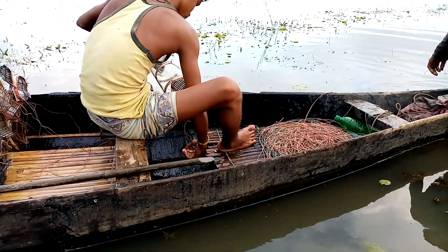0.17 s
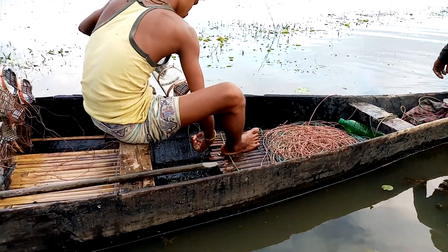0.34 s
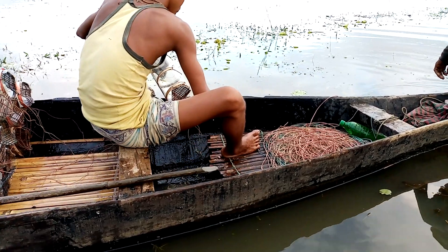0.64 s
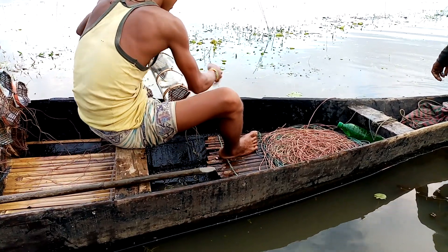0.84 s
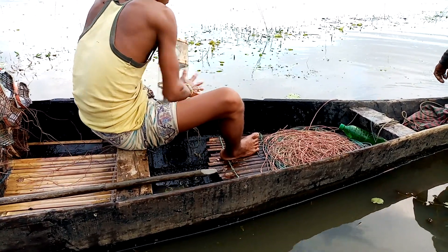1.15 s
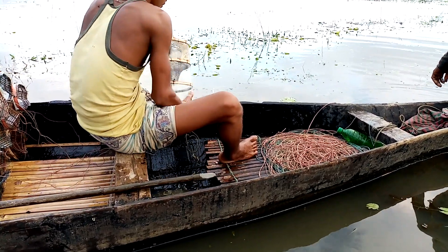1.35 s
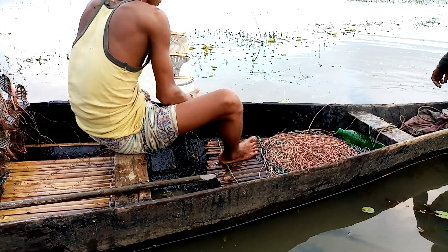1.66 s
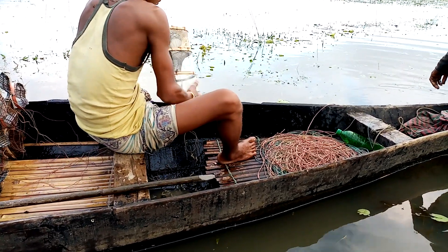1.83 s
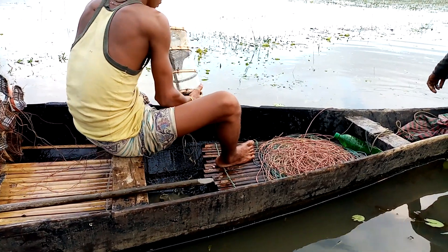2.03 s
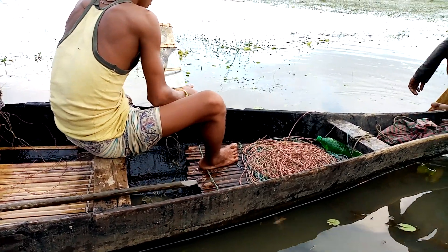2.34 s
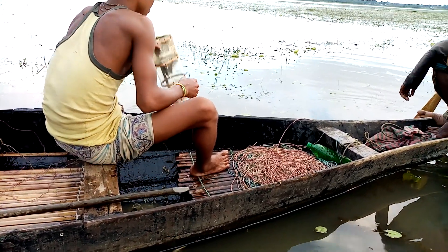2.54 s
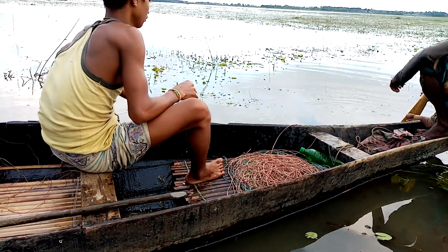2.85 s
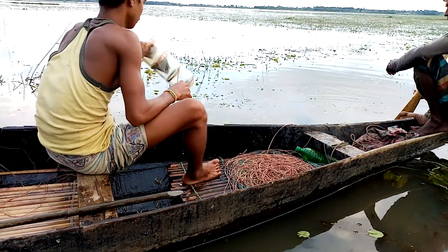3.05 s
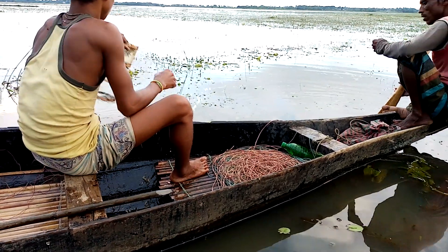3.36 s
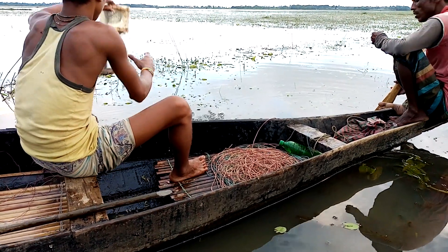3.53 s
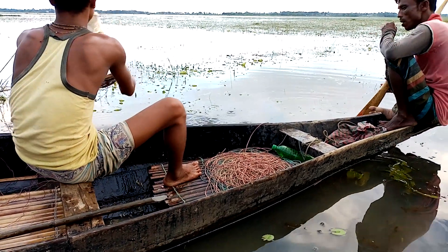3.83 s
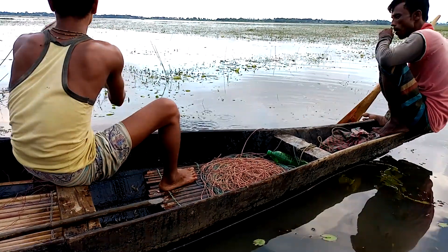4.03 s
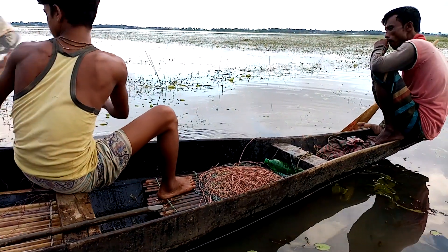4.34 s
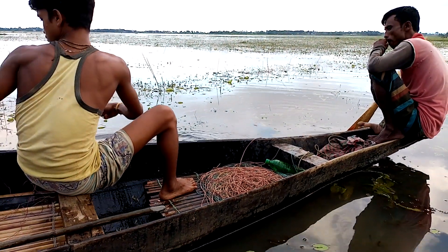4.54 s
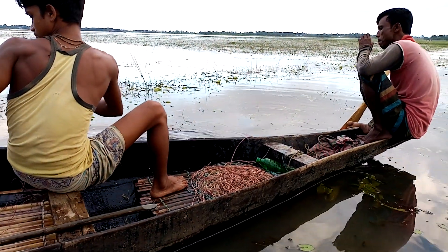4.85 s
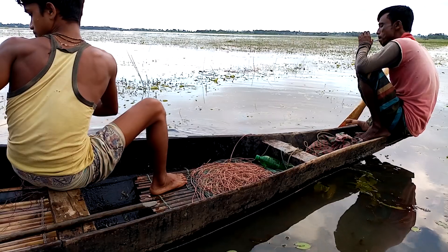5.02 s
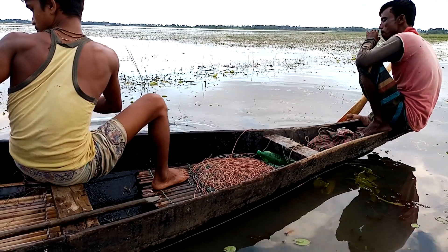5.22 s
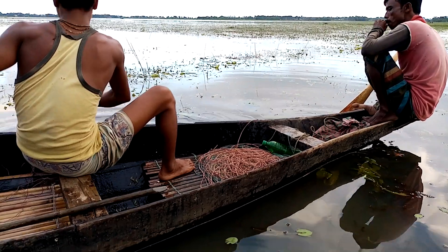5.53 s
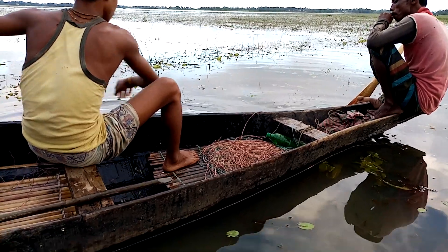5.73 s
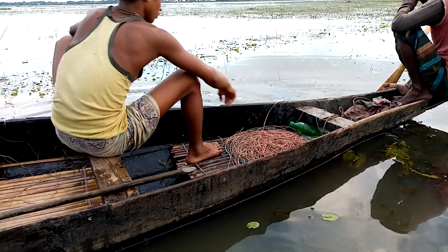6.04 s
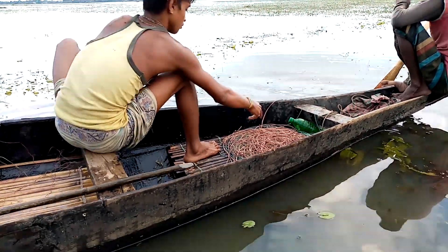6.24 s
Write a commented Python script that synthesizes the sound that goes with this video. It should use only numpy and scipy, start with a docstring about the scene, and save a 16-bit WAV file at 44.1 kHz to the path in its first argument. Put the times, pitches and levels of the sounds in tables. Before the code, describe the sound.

Scattered woody knocks and sharp clicks of handled gear, short rubs of cloth and line, faint distant birds over open water.

```python
"""Fishing gear in a wooden boat

Fishing gear is handled in a boat on a quiet wetland, close to a phone with two microphone ports.
A light reel and its stick knock and chatter: bursts of tiny contacts ring the gear and the hull.
Line and cloth rustle as filtered noise; drops, a squeak and a hum are sine tones or narrow noise.
Small birds and a cock call far off as gliding tones. Noise makes the marsh air and a breeze that
buffets mainly the right port."""
import sys
import numpy as np
from scipy import signal
from scipy.fft import rfft, irfft
from scipy.io import wavfile
from scipy.ndimage import uniform_filter1d, map_coordinates

SR = 44100
rng = np.random.default_rng(int(sys.argv[2]) if len(sys.argv) > 2 else 0)


def to_wav(s):
    """Save 16-bit WAV."""
    ch = np.atleast_2d(s).T  # columns
    pcm = np.round(np.clip(ch, -1, 1) * 32767)  # PCM
    wavfile.write(sys.argv[1], SR, pcm.astype(np.int16))


N = 281358  # length in samples
T = np.arange(N) / SR

# What the gear rings with. Each row: pitch in Hz, width of one filter pass in Hz, level in dB.
WOOD = [(500, 180.6, 0), (727, 85, -3.5), (824, 180, -5.5), (995, 92, -12), (1353, 150, -2), (1774, 56, -6),
        (1926, 109.4, -14.5), (2337, 90, 3), (2925, 130, -0.5)]
# What the hull rings with. Each row: pitch in Hz, width of one filter pass in Hz, level in dB.
HULL = [(190, 73, -3.5), (229.4, 53, 1), (330, 30, -5.5)]
# Colour of the body of a rub. Each row: frequency in Hz, level in dB.
RUB_BODY = [(150, -46), (400, 13.5), (560, 4.5), (900, 9.5), (1150, 8), (1500, 10), (2300, 13.5),
            (3200, -17.5), (5000, -47.5)]
LOOSE_PART_HZ = 980  # ring of the spot struck by a click; the rattle varies around it


def undb(db):
    """Turn decibels into gain."""
    return 10 ** (np.asarray(db) / 20)


def unit(x):
    """Scale to an rms (average strength) of 1."""
    return x / np.sqrt(np.mean(x ** 2))


def dose(x, db):
    """Give a blow the energy of 10 ms of sound at this level."""
    return x * undb(db) * np.sqrt(.01 * SR / np.sum(x ** 2))


def add(out, s, x):
    """Mix x in at time s in seconds."""
    i = max(int(s * SR), 0)
    out[i:i + len(x)] += x[:N - i]


def colour(x, points):
    """Filter by a curve of (Hz, dB) points, joined by straight lines over log frequency."""
    hz, db = np.transpose(points)
    f = np.maximum(np.fft.rfftfreq(len(x), 1 / SR), 1)
    gain = undb(np.interp(np.log(f), np.log(hz), db))
    return irfft(rfft(x) * gain, len(x))


def ring(x, modes):
    """Drive damped resonances (Hz, width in Hz, dB); neighbours move in opposite directions."""
    total = 0
    for k, (hz, width, db) in enumerate(modes):
        resonance = signal.lfilter(*signal.iirpeak(hz, hz / width, SR), x)
        total = total + (-1) ** k * undb(db) * resonance
    return total


def walk(rate):
    """Smooth random wander with a spread of 1, newly aimed about rate times a second."""
    k = max(int(SR / rate), 1)
    steps = np.repeat(rng.standard_normal(N // k + 1), k)
    smooth = uniform_filter1d(uniform_filter1d(steps, k), k)
    return unit(smooth[:N])


def grit(count, share, spread_db):
    """Tiny contacts of very unequal size on a share of the samples."""
    touching = rng.random(count) < share
    size = undb(spread_db * np.minimum(rng.exponential(size=count), 4))
    return rng.standard_normal(count) * touching * size


def shifting(x, flicker_db, rate):
    """Third-octave bands centred from 125 Hz to 16 kHz swell and drop, each on its own."""
    spectrum = rfft(x)
    place = 3 * np.log2(np.maximum(np.fft.rfftfreq(N, 1 / SR), 1) / 125)
    total = 0
    for k in range(22):
        band = irfft(spectrum * np.maximum(1 - abs(place - k), 0), N)
        total = total + band * undb(flicker_db * walk(rate))
    return total


def glide(length, start_hz, end_hz, waver):
    """Phase of a tone that slides in pitch and wavers by a share of it."""
    count = int(length * SR)
    hz = np.linspace(start_hz, end_hz, count) * (1 + waver * walk(860)[:count])
    return 2 * np.pi * np.cumsum(hz) / SR


def breeze():
    """Turbulence rumbles on the right port; the left one lies in the lee and gets far less."""
    # Strength of the breeze before each port's own gain. Each row: time in seconds, level in dB.
    strength = [(0, -67), (0.08, -51.5), (0.3, -52), (0.42, -61.5), (0.74, -41.5), (0.85, -48.5),
                (0.96, -49.5), (1.45, -79), (1.95, -64.5), (2.3, -73), (2.85, -63.5), (3.0, -50.5),
                (3.5, -51.5), (4.05, -57), (4.7, -80), (5.2, -57), (5.45, -86), (5.9, -62.5), (6.1, -65),
                (6.38, -67.5)]
    # Colour of the rumble. Each row: frequency in Hz, level in dB.
    buffet = [(20, -29), (45, -9), (80, 5.5), (130, -0.5), (200, -10), (300, -26), (500, -46), (1500, -82)]
    # Single eddies that slap the right port. Each row: time of the middle in seconds, peak in dB, pitch in Hz.
    eddies = [(0.581, -32.5, 128), (0.721, -29.5, 238), (.737, -34, 102), (3.453, -33.5, 105),
              (3.773, -38.5, 101), (6.087, -39, 87)]
    gust = undb(np.interp(T, *np.transpose(strength)))
    rumbles = []
    for _ in range(2):
        flutter = undb(2.8 * walk(25))
        rumbles.append(gust * flutter * unit(colour(rng.standard_normal(N), buffet)))
    lee, exposed = rumbles
    exposed = undb(3.0) * exposed
    for s, db, hz in eddies:
        cycles = (T - s) * hz
        swell = np.exp(-(cycles / 0.69) ** 2)
        exposed = exposed + undb(db) * swell * np.cos(2 * np.pi * (cycles + rng.random()))
    return np.array([undb(-20) * lee, exposed])


def marsh():
    """Soft, restless air over open water: separate noise at each port."""
    # Colour of the air. Each row: frequency in Hz, level in dB per Hz, relative.
    air_colour = [(18, -55.5), (30, -8.5), (157, -1), (227, -9), (600, -20.5), (801, -17.5), (937, -21.5),
                  (1540, -23), (2170, -21), (2680, -23.5), (2980, -27), (8740, -26.5), (10800, -35.5),
                  (16000, -29.5)]
    level_db = -71.5
    ports = []
    for side_db in (-1.5, 1.5):  # left, right
        air = shifting(rng.standard_normal(N), flicker_db=1.5, rate=11)
        ports.append(undb(level_db + side_db) * unit(colour(air, air_colour)))
    return np.array(ports)


def hum():
    """Noise through one narrow resonance, twice, makes a faint, wavering low hum that dies out."""
    # Loudness of the hum at its source. Each row: time in seconds, level in dB.
    loudness = [(0, -77.5), (1.15, -68), (1.75, -75), (2.1, -88.5)]
    line = [(224.0, 26, 0)]
    tone = unit(ring(ring(rng.standard_normal(N), line), line))
    return undb(np.interp(T, *np.transpose(loudness))) * tone


def birds():
    """Gliding tones: short upward whistles, hoarser calls from far away and a faint crow."""
    # A small bird's rising whistles. Each row: start in seconds, level in dB.
    whistles = [(3.638, -75), (3.997, -75), (4.69, -73), (5.43, -81), (5.778, -75), (6.122, -74)]
    # Their pitch, shifted slightly for each whistle. Each row: seconds from its start, pitch in Hz.
    whistle_shape = [(0, 3230), (.028, 3400), (.048, 3780), (.064, 4050), (.08, 4300)]
    # Calls over the marsh, before the waver. Each row: start in seconds, length in seconds,
    # first pitch in Hz, last pitch in Hz, level in dB.
    far_calls = [(0.049, 0.05, 2400, 2250, -77), (0.128, 0.034, 2560, 2170, -70),
                 (0.304, 0.019, 2110, 2320, -71.5), (0.379, 0.19, 2870, 2600, -86.5),
                 (0.67, 0.24, 1750, 2084, -75.5), (0.769, 0.26, 1966, 1821, -76),
                 (2.08, 0.087, 4450, 3240, -80.5), (2.37, 0.057, 4620, 3300, -78.5)]
    # A very distant cock crows, before the waver. Each row: start in seconds, length in seconds,
    # first pitch in Hz, last pitch in Hz, level in dB.
    crow = [(4.55, .28, 510, 495, -87), (5.12, .27, 545, 510, -82), (5.64, .36, 500, 490, -85)]
    # Overtones of the crow. Each row: multiple of its pitch, level in dB.
    crow_partials = [(2, -1), (4, 0), (5, -6)]
    out = np.zeros(N)
    s_shape, hz_shape = np.transpose(whistle_shape)
    t = np.arange(int(s_shape[-1] * SR)) / SR
    for s, db in whistles:
        hz = np.interp(t, s_shape, hz_shape) * (1 + 0.0032 * rng.standard_normal())
        tone = np.sin(2 * np.pi * np.cumsum(hz) / SR)
        add(out, s, undb(db) * unit(signal.windows.tukey(len(t), .5) * tone))
    for s, length, start_hz, end_hz, db in far_calls:
        phase = glide(length, start_hz, end_hz, waver=.05)
        add(out, s, undb(db) * unit(signal.windows.cosine(len(phase)) * np.sin(phase)))
    for s, length, start_hz, end_hz, db in crow:
        phase = glide(length, start_hz, end_hz, waver=.028)
        voice = sum(undb(partial_db) * np.sin(k * phase) for k, partial_db in crow_partials)
        add(out, s, undb(db) * unit(signal.windows.cosine(len(phase)) * voice))
    return out


def ticks():
    """Faint stray ticks of line and fingers, each with a brief ring of its own."""
    out, t = np.zeros(N), np.arange(SR // 25) / SR
    for when, height, size in rng.random(size=(45, 3)):
        snap = rng.standard_normal(len(t)) * np.exp(-t / .003)
        mode = [(5000 * 2 ** height, 2500, 0)]
        add(out, when * T[-1], dose(ring(ring(snap, mode), mode), -83 + 12 * size))
    return out


def blow(db, crack_db, hull_db, spot_hz, decay_ms):
    """Each blow is a short chatter of contacts that rings the gear and, through the boards, the hull."""
    # Stiff modes behind the sharp crack. Each row: pitch in Hz, width of one filter pass in Hz, level in dB.
    crack_modes = [(3510, 380, 1), (4036, 170, 0.5), (4390, 400, -0.5), (5520, 270, -4.5), (6124, 300, 7),
                   (6400, 560, 4), (7150, 140, -19), (9640, 770, -3)]
    t = np.arange(SR // 5) / SR
    age = t / (decay_ms / 1000)
    # a longer contact also builds more slowly; the gear then scrapes faintly as it settles
    press = (1 - np.exp(-age / .4)) * np.exp(-age) + undb(-33) * np.exp(-t / .025)
    contact = grit(len(t), .4, 2.4) * press
    detune = 1 + 0.068 * rng.standard_normal()  # the grip shifts the gear's modes
    gripped = [(hz * detune, width, mode_db) for hz, width, mode_db in WOOD]
    modes = unit(ring(ring(contact, gripped), [(1300, 5300, 0)]))
    spot = unit(ring(contact, [(spot_hz, 90, 0)]))
    scrape = unit(colour(contact, RUB_BODY))
    wood = modes + undb(-3) * spot + undb(-3) * scrape
    # light touches only tick; hard blows bring out the stiff modes
    tick = unit(ring(ring(contact, [(6900 * detune, 1800, 0)]), [(7550, 7100, 0)]))
    stiff = unit(ring(ring(contact, crack_modes), [(5086, 1530, 0)]))
    crack = stiff + undb(-.5 * (db + 52.0)) * tick
    thud = ring(ring(contact, HULL), [(260, 830, 0)])
    total = dose(wood, db) + dose(crack, db + crack_db) + dose(thud, db + hull_db)
    return total * (1 - t / t[-1])


def knocks():
    """Knocks, dull taps and sharp clicks strike the same gear and differ in the hardness of the contact."""
    # Gear knocks on wood. Each row: start in seconds, level of the wood in dB, crack in dB relative
    # to the wood, ring of the struck spot in Hz, decay of the contact in milliseconds.
    hard_knocks = [(1.081, -29, -4.5, 1290, 15.7), (1.0973, -33.5, 8.5, 1330, 2.44),
                   (1.134, -47, 3, 760, 4.8), (1.2172, -52, -2.5, 1280, 4.2), (1.2543, -33.5, -3, 878, 6.4),
                   (1.2681, -35, -11, 980, 4), (1.377, -52, 0, 825, 4.6), (1.4551, -56.5, -2, 875, 3.1),
                   (1.495, -53, -4, 1370, 8.7), (1.7873, -41.5, -3.5, 1240, 7),
                   (1.802, -40.5, -5.5, 690, 6.7), (1.914, -36.5, -12, 815, 4.9),
                   (2.649, -42.5, 0.5, 710, 8), (2.7562, -46.5, -3, 1315, 6.6),
                   (3.2095, -53.5, 0.5, 1410, 4.2), (3.5013, -51, -1.5, 680, 5.6),
                   (3.636, -51, -2, 640, 10.3), (3.844, -51.5, 5, 1920, 2.5), (4.3805, -48, 4.5, 537, 3.6),
                   (4.962, -50, -10, 1000, 2.84), (5.649, -62, 10.5, 670, 7.6)]
    # Dull taps of a hand on the gear. Each row: start in seconds, level in dB, ring of the spot in Hz.
    taps = [(1.355, -50.5, 810), (2.028, -66.5, 880), (3.058, -54.5, 835), (3.486, -53, 654),
            (3.522, -51.5, 640), (3.737, -57.5, 607), (4.26, -60.5, 580), (4.82, -53, 676),
            (5.1207, -45.5, 940), (5.1335, -47.5, 964), (5.1627, -51.5, 880)]
    # Sharp clicks of line and reel. Each row: start in seconds, level of the crack in dB.
    clicks = [(0.289, -65), (2.2875, -57.5), (2.578, -59.5), (3.0726, -42.5), (3.4412, -51), (4.482, -60.5),
              (5.757, -56.5), (6.091, -73.5)]
    knock_hull_db = -11.5  # hull levels and crack levels are relative to the wood
    # a soft contact hardly cracks and is dull above this pitch
    tap_ms, tap_crack_db, tap_hull_db, tap_soft_hz = 4.1, -26, -12, 1630
    click_ms, click_crack_db, click_hull_db = 1, 24, -18  # a hard, light contact is nearly all crack
    out = np.zeros(N)
    for s, db, crack_db, spot_hz, decay_ms in hard_knocks:
        add(out, s, blow(db, crack_db, knock_hull_db, spot_hz, decay_ms))
    for s, db, spot_hz in taps:
        tap = blow(db, tap_crack_db, tap_hull_db, spot_hz, tap_ms)
        soft = signal.lfilter(*signal.butter(2, tap_soft_hz, fs=SR), tap)
        add(out, s, dose(soft, db))
    for s, db in clicks:
        add(out, s, blow(db - click_crack_db, click_crack_db, click_hull_db, LOOSE_PART_HZ, click_ms))
    return out


def bumps():
    """Dull thumps, the first from wind, the rest from boards set swinging: a fading tone and a little clunk."""
    # Dull bumps of feet and gear on the boards; the first is the upper part of a wind thump.
    # Each row: start in seconds, level in dB, pitch in Hz, decay in milliseconds.
    dull_bumps = [(0.716, -51.5, 446, 2.8), (1.791, -43.5, 200, 4.1), (2.711, -52, 309, 16),
                  (2.758, -40, 298, 21), (2.891, -51, 262, 10.4), (5.42, -62.5, 272, 9.7),
                  (6.265, -49, 151, 24), (6.269, -57, 310.5, 11.5)]
    out, t = np.zeros(N), np.arange(SR // 5) / SR
    for s, db, hz, decay_ms in dull_bumps:
        fade = (1 - np.exp(-t / 0.0031)) * np.exp(-t / (decay_ms / 1000))
        clunk = unit(ring(ring(rng.standard_normal(len(t)), WOOD), [(600, 190, 0)]))
        tone = np.sin(2 * np.pi * hz * t)
        add(out, s, dose(fade * (tone + undb(-29) * clunk), db))
    return out


def rustle():
    """Line and cloth slide in a long rummage and in quick strokes: dense slips with a trace of ringing."""
    # The long rummage, before the final gains. Each row: time in seconds, body in dB, hiss in dB.
    rummage = [(2.629, -77, -83), (2.661, -46.5, -51), (2.73, -59.5, -65), (2.79, -47, -63),
               (2.85, -58.5, -64.5), (3.22, -61.5, -65.5), (3.32, -54, -57.5), (3.5, -69.5, -63.5),
               (3.6, -91, -77)]
    # Single short strokes of line or hand, before the final gains. Each row: start in seconds,
    # length in seconds, body in dB, hiss in dB.
    rubs = [(1.141, 0.11, -74, -76), (1.326, 0.15, -62.5, -68), (3.65, 0.47, -74, -82),
            (4.336, 0.057, -51.5, -51.5), (4.946, 0.056, -55, -60.5), (5.038, 0.055, -59.5, -57.5),
            (5.11, 0.051, -53, -63.5), (5.646, 0.039, -60, -59)]
    # Colour of the hiss. Each row: frequency in Hz, level in dB.
    rub_hiss = [(2000, -22), (3500, -1.5), (5000, -0.5), (6500, 1.5), (8500, -9), (10500, -13.5),
                (16000, -28.5)]
    hull_db, swell_db = -14, 2.5  # rubbing stirs the hull; the body swells and sinks with the hand's pressure
    times, *levels = np.transpose(rummage)
    # silent before and after the rummage; powers add up
    body_power, hiss_power = (undb(np.interp(T, times, db, -np.inf, -np.inf)) ** 2 for db in levels)
    for s, length, body_db, hiss_db in rubs:
        # catches quickly and dies away
        stroke = np.exp(np.minimum(T - s, 0) / 0.0044 - np.maximum(T - s - length, 0) / 0.0099)
        body_power += (stroke * undb(body_db)) ** 2
        hiss_power += (stroke * undb(hiss_db)) ** 2
    # the bands flicker as the touching spot moves
    slips = shifting(grit(N, .25, 2.6) * undb(2.4 * walk(70)), flicker_db=4, rate=55)
    body = unit(colour(slips, RUB_BODY)) + undb(-13.5) * unit(ring(slips, WOOD))
    hull = unit(ring(ring(slips, HULL), [(280, 200, 0)]))
    body = (body + undb(hull_db) * hull) * undb(swell_db * walk(35))
    hiss = unit(colour(slips, rub_hiss))
    return undb(-2.0) * np.sqrt(body_power) * unit(body) + undb(2.0) * np.sqrt(hiss_power) * hiss


def rattle():
    """Loose parts touch at uneven intervals, on one of a dozen spots and with varying strength."""
    # The loose gear rattles as it is moved. Each row: start in seconds, length in seconds,
    # typical level of a contact in dB.
    rattles = [(1.324, .13, -60), (1.508, .14, -72), (1.833, .07, -56.5), (1.939, .12, -70),
               (2.898, .6, -63.5), (3.679, .4, -74)]
    per_s, spread_db = 33, 3  # contacts a second, variation either way
    decay_ms, crack_db, hull_db = 4.6, -3.5, -7.5
    out = np.zeros(N)
    contacts = []
    for octaves in rng.uniform(-.5, .5, size=12):
        contacts.append(blow(-60, crack_db, hull_db, LOOSE_PART_HZ * 2 ** octaves, decay_ms))
    for s, length, db in rattles:
        for k, (late, pick, strength) in enumerate(rng.random(size=(30, 3))):
            after = (k + late) / per_s
            if after < length:
                contact = contacts[int(pick * len(contacts))]
                add(out, s + after, dose(contact, db + spread_db * (2 * strength - 1)))
    return out


def drips():
    """Each drop traps a bubble that rings briefly and rises in pitch."""
    # Small wet blips, like drops falling in the bilge. Each row: start in seconds, level in dB,
    # starting pitch in Hz.
    drops = [(4.482, -64.5, 2590), (4.602, -66, 2610), (5.423, -67, 1854), (5.505, -67.5, 1287)]
    decay_ms, rise_per_s = 6.4, 4.9  # the pitch climbs by this share of its start each second
    out, t = np.zeros(N), np.arange(SR // 16) / SR
    for s, db, hz in drops:
        fade = (1 - np.exp(-t / 0.00068)) * np.exp(-t / (decay_ms / 1000))
        phase = 2 * np.pi * hz * np.cumsum(1 + rise_per_s * t) / SR
        add(out, s, dose(fade * np.sin(phase), db))
    return out


def squeaks():
    """Stick and slip locks briefly onto one rough tone."""
    # The reel squeaks as it is twisted. Each row: start in seconds, length in seconds,
    # pitch in Hz before the waver, level in dB.
    reel_squeaks = [(4.959, 0.011, 2320, -45), (4.945, 0.082, 2600, -63.5)]
    out = np.zeros(N)
    for s, length, hz, db in reel_squeaks:
        phase = glide(length, hz, hz, waver=.06)
        add(out, s, undb(db) * unit(signal.windows.hann(len(phase)) * np.sin(phase)))
    return out


def in_boat(x, lag_ms, planks_db, tail_db):
    """The right port hears the sound lag_ms later; planks and sides scatter brief echoes to both."""
    # Tone of the left port. Each row: frequency in Hz, level in dB.
    left_port = [(100, 5), (1000, 2.5), (6000, -2.5), (9000, -2), (12500, -7), (16000, -30)]
    # Tone of the right port, with extra treble. Each row: frequency in Hz, level in dB.
    right_port = [(100, 3), (1000, 5.5), (6000, 1), (9000, 7.5), (12500, -1), (14200, 9.5), (15200, 26.5),
                  (16200, 4)]
    t = np.arange(SR // 3) / SR
    ports = []
    for delay_ms, port in ((0, left_port), (lag_ms, right_port)):
        echoes = rng.standard_normal(len(t)) * np.exp(-t / .004) * (t > .0005)
        # the planks scatter long waves less
        planks = signal.lfilter(*signal.butter(1, 1200, "high", fs=SR), echoes)
        tail = ring(rng.standard_normal(len(t)), [(1100, 9000, 0)]) * np.exp(-t / 0.059)
        scatter = (undb(planks_db) * unit(planks) + undb(tail_db) * unit(tail)) / np.sqrt(len(t))
        direct = map_coordinates(x, [(T - delay_ms / 1000) * SR], order=3)
        ports.append(colour(direct + signal.fftconvolve(x, scatter)[:N], port))
    return np.array(ports)


def scene():
    """Gear in the boat, birds and air around it."""
    # How much later the right port hears the gear as the phone moves. Each row: time in seconds,
    # delay in milliseconds.
    lag = [(1.1, 1.04), (2.7, 1.011), (4.35, 1.214), (5.05, 1.236), (6.3, 1.22)]
    lag_ms = np.interp(T, *np.transpose(lag))
    far = in_boat(birds() + hum(), 0, planks_db=-9, tail_db=-13)
    blows = in_boat(knocks() + rattle() + bumps() + drips(), lag_ms, planks_db=-6, tail_db=-27)
    # the rubbing spot wanders with the hands
    rub_lag_ms = lag_ms + .07 * walk(60)
    rubbing = in_boat(rustle() + squeaks() + ticks(), rub_lag_ms, planks_db=-8, tail_db=-24)
    return blows + rubbing + far + breeze() + marsh()


def record(dry):
    """The phone cuts the top steeply with a low-pass filter."""
    top_hz = 15900
    return signal.sosfilt(signal.ellip(8, .2, 70, top_hz, fs=SR, output="sos"), dry)


dry = scene()
out = record(dry)
to_wav(out)
```